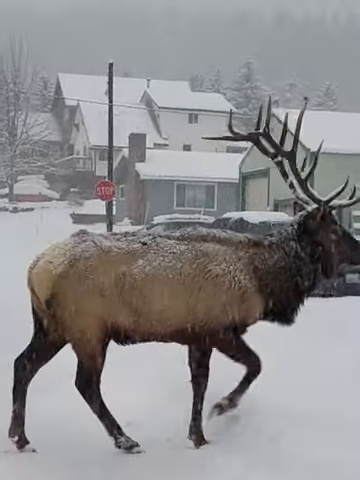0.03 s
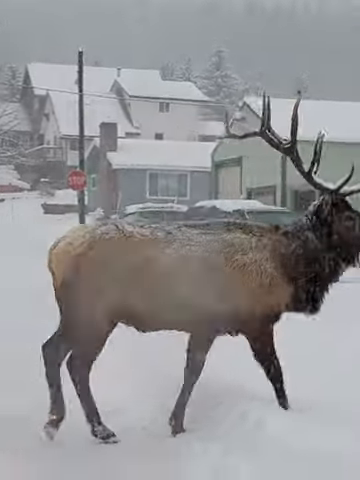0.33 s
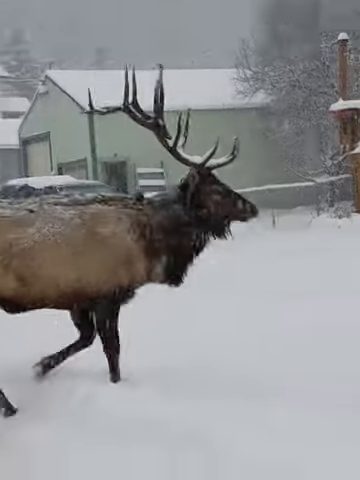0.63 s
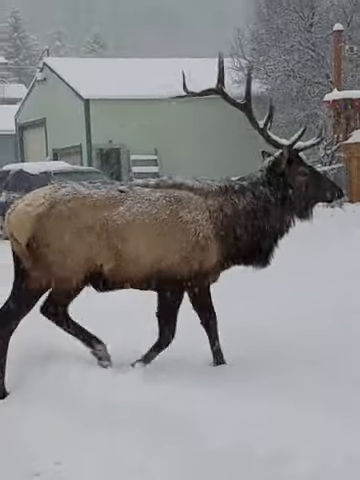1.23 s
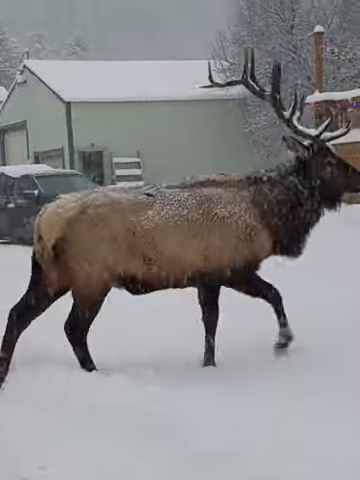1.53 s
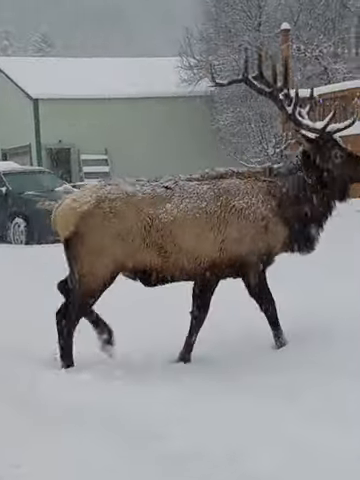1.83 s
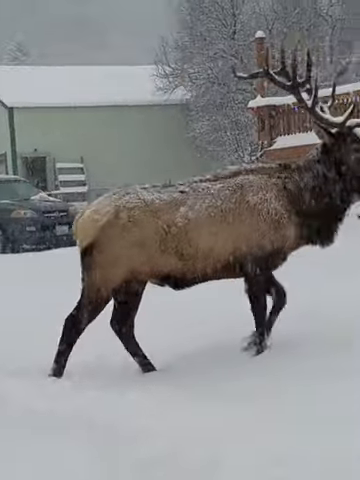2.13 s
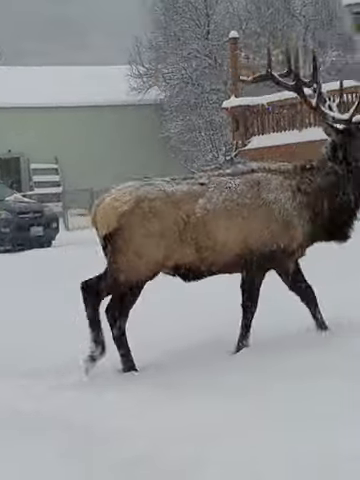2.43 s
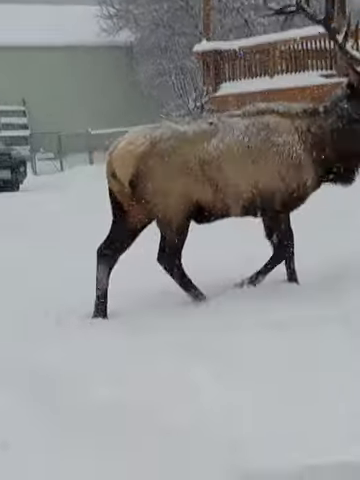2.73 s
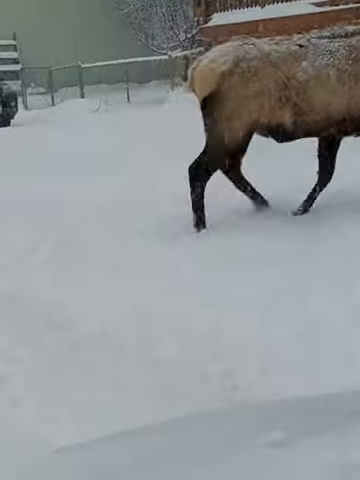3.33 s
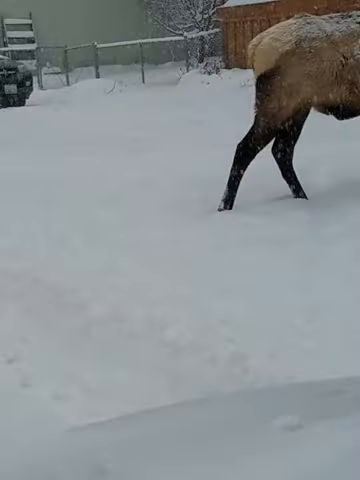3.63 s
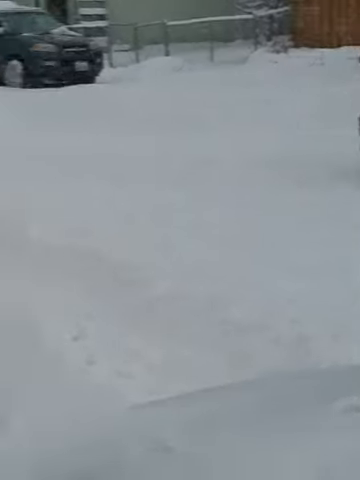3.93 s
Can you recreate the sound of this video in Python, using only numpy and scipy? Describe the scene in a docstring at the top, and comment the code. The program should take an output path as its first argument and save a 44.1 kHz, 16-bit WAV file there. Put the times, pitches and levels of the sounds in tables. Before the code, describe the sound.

Low, steady rumble of an idling car engine close by, with brief clicks on the microphone.

```python
"""A four-cylinder engine idles steadily beside a hand-held camera in a snowy street.
Each firing pushes a deep throb from the exhaust, with a short boom, and sets the metalwork clattering.
Dry handling ticks land on one microphone port or the other, and a few dull knocks bump the camera body.
Two faint falling chirps and a soft outdoor hush lie behind."""
import sys
import numpy as np
from scipy import signal
from scipy.fft import rfft, irfft
from scipy.io import wavfile
from scipy.ndimage import uniform_filter1d

SR = 44100
rng = np.random.default_rng(int(sys.argv[2]) if len(sys.argv) > 2 else 0)


def put_to_file(sound):
    """Save the sound as 16-bit audio at rate SR, in the file named by the first command-line argument."""
    columns = np.atleast_2d(sound).T  # one column per channel
    safe = np.clip(columns, -1, 1)
    whole_steps = np.round(safe * 32767)
    wavfile.write(sys.argv[1], SR, whole_steps.astype(np.int16))


N = 176400
FIRINGS_PER_S, CUTOFF_HZ = 24.577, 16600


def firings(first_s=.0117, jitter_s=.00029, uneven_db=.61):
    """Times and strengths of the firings: four cylinders take turns, each a little uneven."""
    # accent of each cylinder in firing order: level/dB
    cylinders_db = [0.31, -0.36, 0.66, -0.22]
    k = np.arange(-4, int(N / SR * FIRINGS_PER_S) + 4)
    late, strong = rng.standard_normal((len(k), 2)).T
    times = first_s + k / FIRINGS_PER_S + jitter_s * late
    return times, amp(np.take(cylinders_db, k, mode="wrap") + uneven_db * strong)


def exhaust(cycles, strength, level_db=-32.5, body_lag_s=.0042, port_lag_s=.00038):
    """The throb: one rounded pressure pulse per firing, built from harmonics of the firing rate."""
    # exhaust note: harmonic number, relative level/dB
    harmonics = [(1, -10), (2, -11.5), (3, -6.5), (4, 3.5), (5, -5), (6, -0.5), (7, -13), (8, -24),
                 (9, -22.5), (10, -32), (11, -47), (12, -29.5), (13, -48), (14, -57), (15, -31.5),
                 (16, -33.5), (17, -41.5), (18, -32.5), (19, -56), (20, -43.5), (21, -52), (22, -39.5)]
    # stereo lean of the throb: f/Hz, left minus right/dB
    lean = [(25, -4.5), (50, -5), (75, -1), (100, -1.5), (150, -.5), (300, -1)]
    out, side = np.zeros((2, N)), np.array([[.5], [-.5]])
    for k, db in harmonics:
        hz = k * FIRINGS_PER_S
        body_s = body_lag_s * (hz < 60)  # the lowest harmonics come late, through the shaking bodywork
        port_s = side * port_lag_s * min(1, 100 / hz)  # the left port hears the throb a little later
        phase = 2 * np.pi * (k * cycles - hz * (body_s + port_s))
        out += amp(db + side * curve(lean, hz)) * np.cos(phase)
    return amp(level_db) * unit(out * strength)


def boom(times, ring_hz=135, delay_s=.001, peak_s=.008, level_db=-53):
    """A short low ring, of random strength and phase after every firing, roughens the throb."""
    out, t = np.zeros(N), np.arange(2048) / SR
    phase = 2 * np.pi * ring_hz * t
    swell = t ** 2 * np.exp(-2 * t / peak_s)
    for s in times[times > 0]:
        a, b = rng.standard_normal(2)
        add(out, s + delay_s, (a * np.cos(phase) + b * np.sin(phase)) * swell)
    return amp(level_db) * unit(out)


def clatter(times, strengths, repeat=.42, decay_s=.0052, level_db=-62, size=1024):
    """Short rattling blows, partly the same in every firing, ring the engine's metalwork."""
    # blows of the mechanism: share of the firing period, relative level/dB
    strokes = [(.17, -11), (.7, -11.5), (0.919, -15)]
    # resonances of the metalwork: f/Hz, width/Hz, relative level/dB
    metalwork = [(427.5, 11.4, 0.5), (509, 31, -4.5), (726, 24, -12), (1121, 19.6, -4.5), (1305, 25, -21.5),
                 (1590, 31, -20), (2300, 60, -51)]
    t, hz = np.arange(size) / SR, np.fft.rfftfreq(N, 1 / SR)
    drive = np.zeros((2, N))
    for track in drive:
        for share, db in strokes:
            signature = rng.standard_normal(size)
            for s, strength in zip(times + share / FIRINGS_PER_S, strengths):
                if s > 0:
                    blow = repeat * signature + (1 - repeat) * rng.standard_normal(size)
                    add(track, s, strength * amp(db) * blow * np.exp(-t / decay_s))
    metal = sum(amp(db) * 1j * hz * width / (f ** 2 - hz ** 2 + 1j * hz * width)
                for f, width, db in metalwork)
    return amp(level_db) * unit(irfft(stereo_pair(*rfft(drive), hz) * metal, N))


def ticks(pivot_hz=6500, crumble_db=-1, specks_per_s=40, speck_db=-52.5, size=512):
    """Handling snaps with a brief crumbling tail, each at one port only; tiny specks fall at random."""
    # snaps: t/s, port (0 left, 1 right), level/dB, tilt/(dB per octave), low cut/Hz, crumble decay/s
    snaps = [ (.0195, 0, -33, 1, 4000, .0003), (.0574, 0, -27, 0, 5070, 0.00074),
             (.2105, 0, -35, -4, 4000, .0004), (.2260, 0, -33, -2, 5000, .0005),
             (.2486, 0, -17, -4, 1500, 0.000052), (1.555, 0, -32, 2, 4000, .0005),
             (1.613, 0, -31, 6, 1800, 0.00041), (1.9902, 0, -21.5, -1.5, 1410, 0.0007),
             (1.9924, 0, -24, 2, 1200, 0.00091), (2.0179, 0, -33, -3, 1500, .0003),
             (2.1335, 1, -37, 4, 6000, .0005), (2.6329, 0, -33, -3, 1500, 0.0026),
             (2.9742, 1, -35, 4, 4000, .0003), (3.1658, 0, -31, -2, 4000, .0003),
             (3.2192, 0, -35, 1, 5000, .0006), (3.2305, 1, -35, -2, 6000, .0006),
             (3.3188, 0, -30, -6, 1750, .0002), (3.3468, 0, -28.5, -3, 2000, .0006),
             (3.3527, 1, -27, 2, 9000, .0001), (3.7014, 1, -14.5, -1, 6000, .0001),
             (3.9566, 0, -32, 1, 3000, .0004)]
    # colour of a tick in the left port, then in the right: f/Hz, level/dB
    ports = [
        [(500, -5), (1800, -2), (2700, 2), (4000, -4), (5500, -5), (6400, -11), (8300, 0), (10700, -7),
         (13500, 0), (16500, -4)],
        [(500, -5), (4600, -2), (6200, -8), (9200, 3), (12000, -4), (15000, -.5), (16500, -3)],
    ]
    out = np.zeros((2, N))
    for s, port, db, tilt_db, edge_hz, crumble_s in snaps:
        snap = amp(crumble_db) * burst(crumble_s, size)
        snap[0] = 1  # sharp attack
        add(out[port], s, amp(db) * np.convolve(snap, impulse(ports[port], tilt_db, pivot_hz, edge_hz)))
    for track, colour in zip(out, ports):
        hits = rng.random(N) < specks_per_s / 2 / SR
        specks = hits * amp(speck_db + 2 * np.minimum(rng.exponential(1, N), 2))
        add(track, 0, signal.oaconvolve(specks, impulse(colour, 0, pivot_hz, edge_hz=9000)))
    return out


def knocks(pivot_hz=1460, scuff_db=2, thud_hz=260, thud_decay_s=.0052, thud_db=-22, size=2048):
    """Short scuffing blows on the camera's body, which answers with a low thud."""
    # blows: t/s, level/dB, tilt/(dB per octave), decay/s, left minus right/dB, high cut/Hz
    blows = [(0.69, -29, 2, 0.0067, 8, 1400), (2.559, -33, 9, 0.0024, -6, 4000),
             (2.5635, -16.5, 1, 0.002, -10.5, 12000), (2.5759, -28, 2, 0.009, -22, 7000),
             (3.1952, -20, -2.5, 0.0017, -17, 656)]
    # colour of the knocked body: f/Hz, level/dB
    colour = [(100, -14), (350, 13.5), (750, 6), (1100, 1.5), (1700, -4), (2400, 3), (3500, -16),
              (6000, -23), (9000, -17.5), (16000, -28)]
    out, t = np.zeros((2, N)), np.arange(size) / SR
    thud = amp(thud_db) * np.sin(2 * np.pi * thud_hz * t) * np.exp(-t / thud_decay_s)
    for s, db, tilt_db, decay_s, lean_db, dull_hz in blows:
        body = impulse(colour, tilt_db, pivot_hz, edge_hz=180)
        body = signal.lfilter(*signal.butter(2, dull_hz, fs=SR), body)
        for track, side in zip(out, (.5, -.5)):
            scuff = amp(scuff_db) * burst(decay_s, size)
            scuff[0] = .45  # first contact
            add(track, s, amp(db + side * lean_db) * np.convolve(scuff, body))
            add(track, s, amp(db + tilt_db * np.log2(thud_hz / pivot_hz)) * thud)
    return out


def chirps():
    """Thin, far whistles that slide down."""
    # whistles: t/s, length/s, start f/Hz, end f/Hz, level/dB
    whistles = [(3.158, 0.045, 4200, 3470, -73), (3.235, 0.042, 4850, 3650, -73)]
    out = np.zeros(N)
    for s, length, start_hz, end_hz, db in whistles:
        progress = np.arange(0, length, 1 / SR) / length
        hz = start_hz * (end_hz / start_hz) ** progress
        add(out, s, amp(db) * np.sin(np.pi * progress) * np.sin(2 * np.pi * np.cumsum(hz) / SR))
    return out


def hush(cycles, level_db=-52, pulsing=.1, patchy_db=1, size=1024, hop=256):
    """A soft, patchy bed of street air and microphone hiss; its lower part pulses with the engine."""
    # colour of the bed: f/Hz, relative level/dB
    colour = [(20, -2.5), (60, -1), (110, 3.5), (170, 4.5), (260, -3), (450, -5.5), (700, -8), (950, -14),
              (1150, -12.5), (1600, -18), (2600, -23), (4000, -30), (7200, -37), (9000, -33.5),
              (12000, -26), (15000, -26), (15700, -21), (16050, -54)]
    hz = np.fft.rfftfreq(size, 1 / SR)
    a, b, c, d, patches = rng.standard_normal((5, N // hop + 5, len(hz)))
    patches = uniform_filter1d(patches, size=8, axis=0)  # smear in time
    patches = unit(uniform_filter1d(patches, size=14, axis=1))  # and in frequency
    spectra = stereo_pair(a + 1j * b, c + 1j * d, hz) * amp(curve(colour, hz) + patchy_db * patches)
    noise = signal.istft(spectra.swapaxes(1, 2), nperseg=size, noverlap=size - hop)[1][:, :N]
    low = signal.sosfiltfilt(signal.butter(2, 3000, fs=SR, output="sos"), noise)
    return amp(level_db) * unit(noise + pulsing * low * np.cos(2 * np.pi * cycles))


def stereo_pair(left, other, hz):
    """Blends two independent spectra into left and right: narrow in the bass, wide in the treble."""
    # likeness of the two ports: f/Hz, correlation
    likeness = [(30, 1), (130, 0.31), (280, 0.37), (500, 0.57), (1000, -0.038), (2000, -0.039),
                (15000, -0.21)]
    same = curve(likeness, hz)
    return np.array([left, same * left + np.sqrt(1 - same ** 2) * other])


def impulse(colour, tilt_db, pivot_hz, edge_hz):
    """A minimum-phase click with a colour, a tilt per octave and a low cut."""
    hz = np.fft.rfftfreq(2048, 1 / SR) + 1
    gain = amp(curve(colour, hz) + tilt_db * np.log2(hz / pivot_hz)) / np.sqrt(1 + (edge_hz / hz) ** 6)
    log_gain = np.log(np.maximum(gain, 1e-4))
    mirrored = np.r_[log_gain, log_gain[-2:0:-1]]
    return np.fft.ifft(np.exp(np.conj(signal.hilbert(mirrored)))).real


def burst(decay_s, size):
    """A dying puff of noise with an energy of one."""
    t = np.arange(size) / SR
    return unit(rng.standard_normal(size) * np.exp(-t / decay_s)) / np.sqrt(size)


def amp(db):
    """Decibels to gain."""
    return 10 ** (np.asarray(db) / 20)


def unit(x):
    """Scales to an rms of one."""
    return x / np.sqrt(np.mean(x ** 2) + 1e-20)


def curve(points, hz):
    """Reads a table along a log-frequency axis."""
    f, value = np.transpose(points)
    return np.interp(np.log(hz + 1), np.log(f + 1), value)


def add(track, s, sound):
    """Mixes a sound into a track at s seconds."""
    part = track[max(round(s * SR), 0):][:len(sound)]
    part += sound[:len(part)]


def scene():
    """The idling engine, the hush and the small sounds around them."""
    times, strengths = firings()
    t = np.arange(N) / SR
    cycles = np.interp(t, times, np.arange(len(times)))  # rises by one per firing
    engine = exhaust(cycles, np.interp(t, times, strengths)) + boom(times) + clatter(times, strengths)
    return engine + hush(cycles) + ticks() + knocks() + chirps()


def record(dry):
    """A steep low-pass trims the highest treble."""
    lowpass = signal.firwin(511, CUTOFF_HZ, window=("kaiser", 9), fs=SR)
    return signal.oaconvolve(dry, lowpass[None], "same")


dry = scene()
out = record(dry)
put_to_file(out)
```